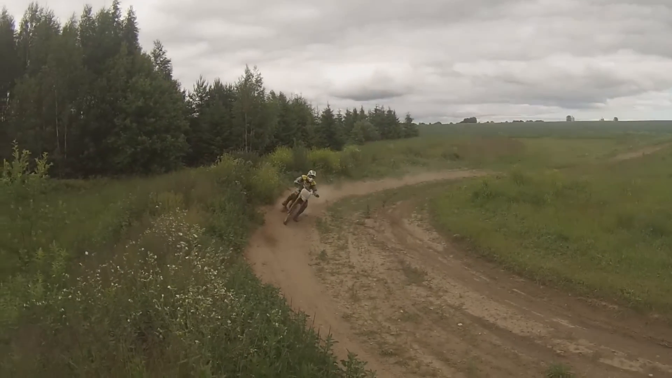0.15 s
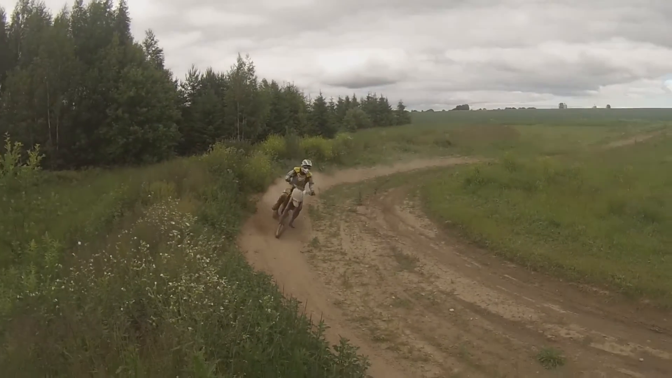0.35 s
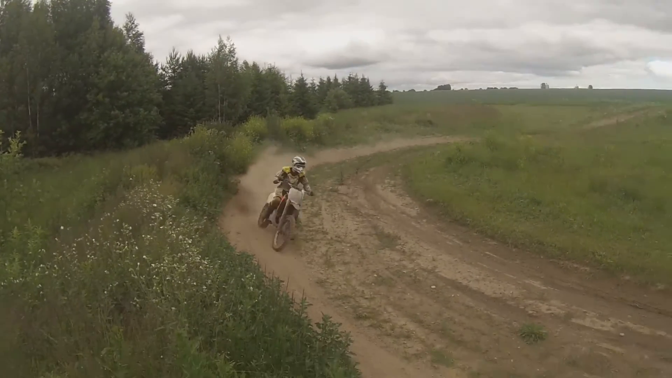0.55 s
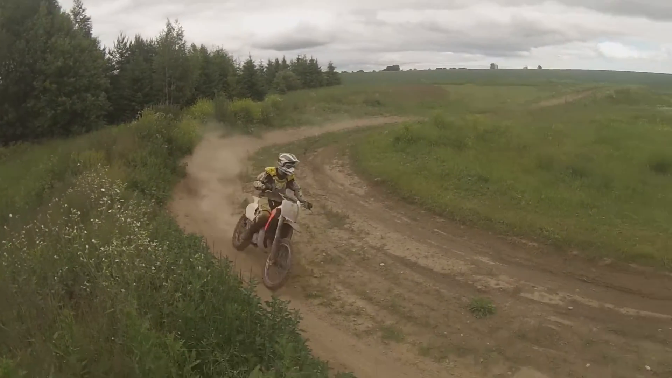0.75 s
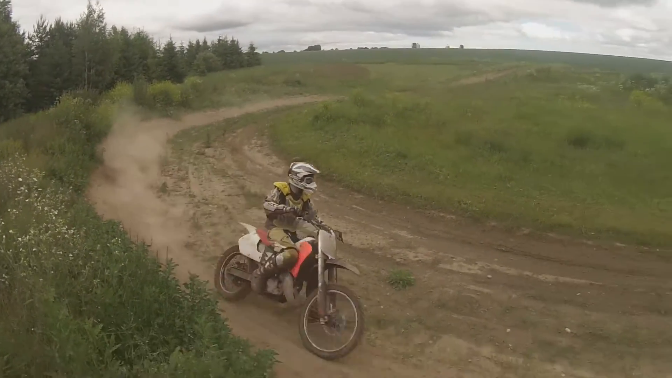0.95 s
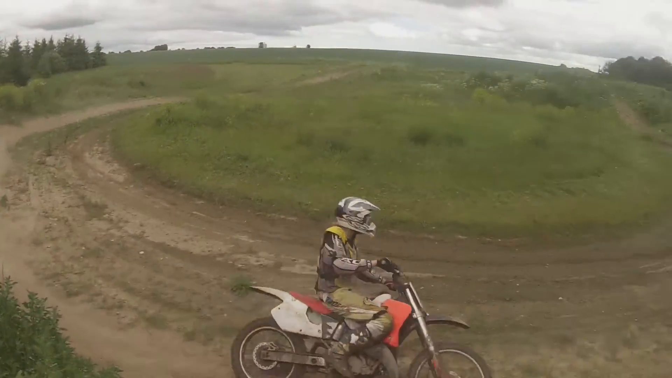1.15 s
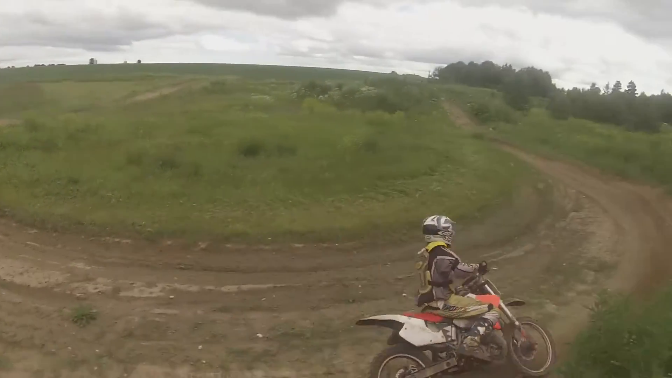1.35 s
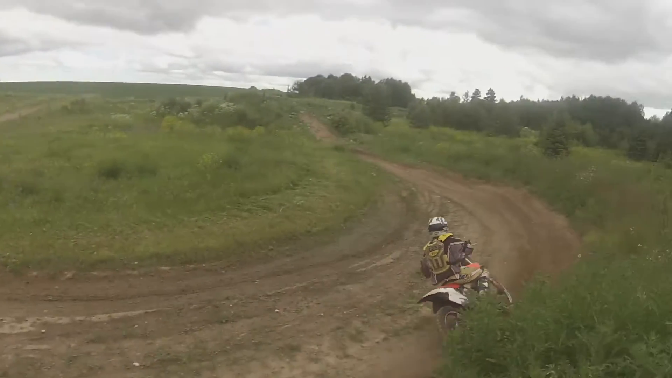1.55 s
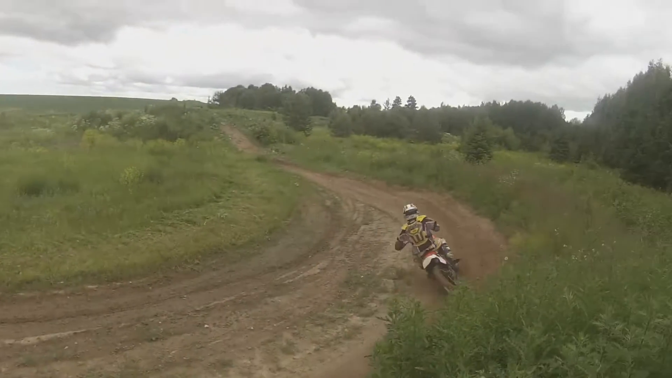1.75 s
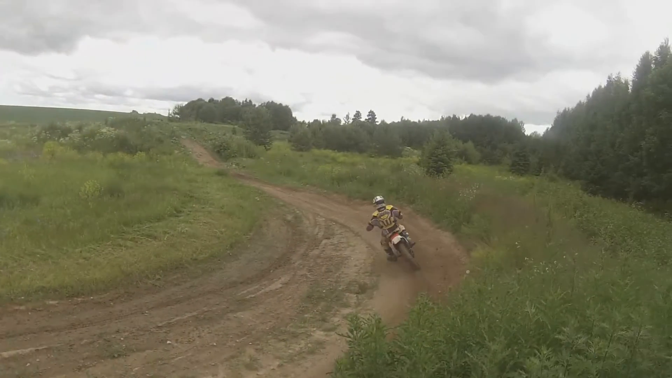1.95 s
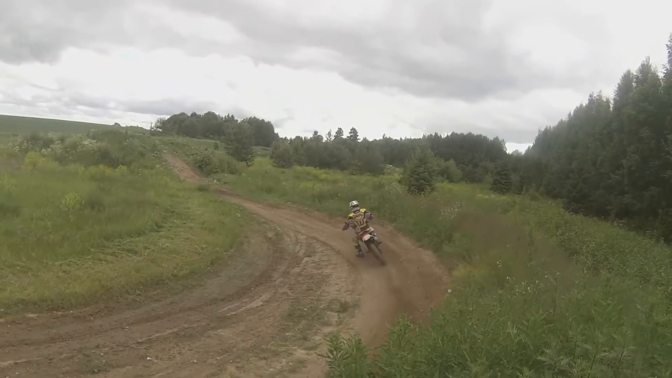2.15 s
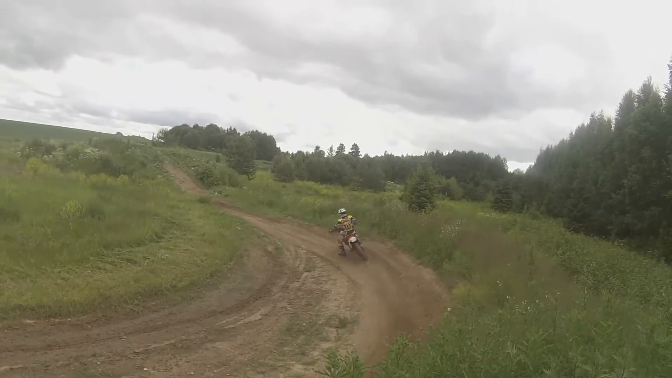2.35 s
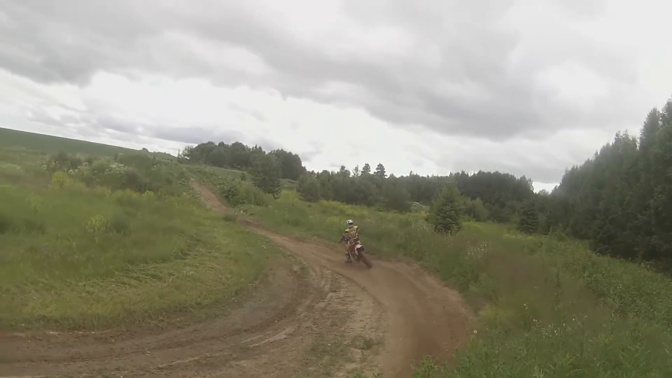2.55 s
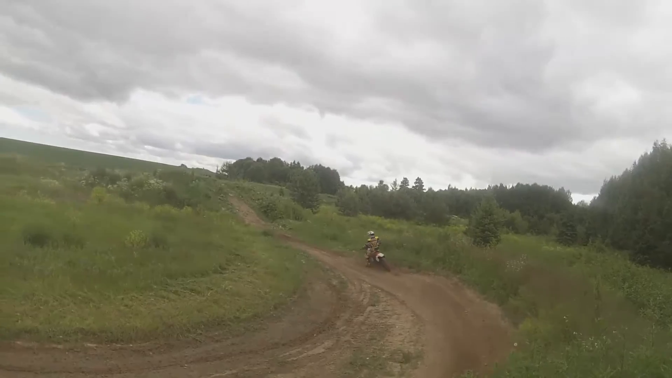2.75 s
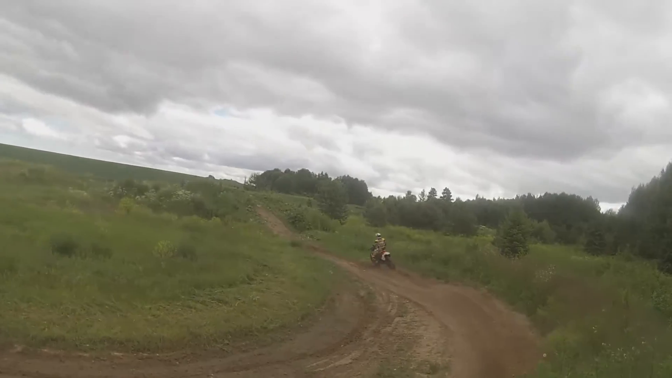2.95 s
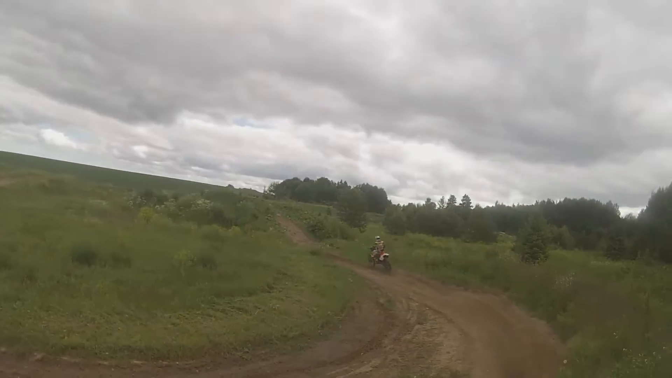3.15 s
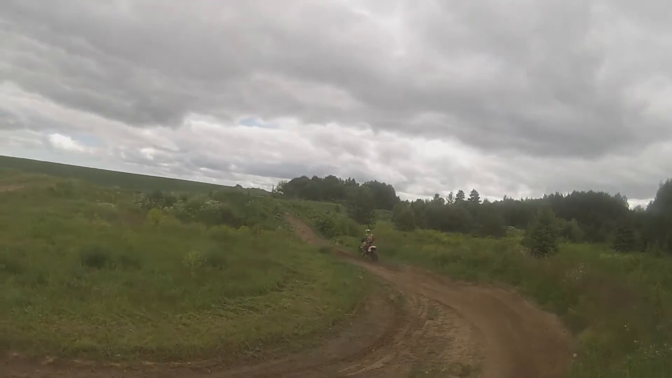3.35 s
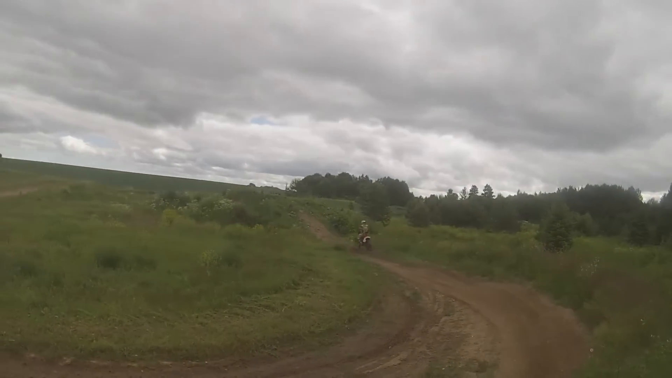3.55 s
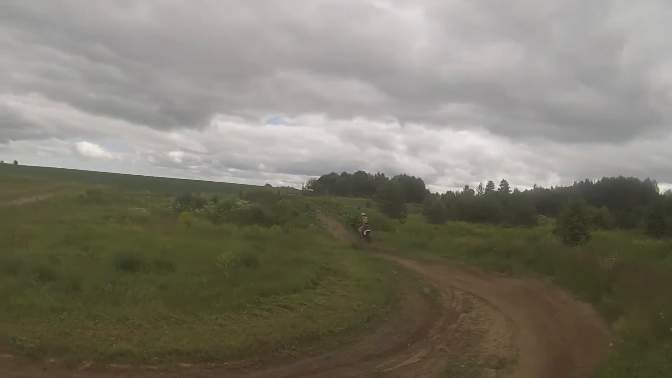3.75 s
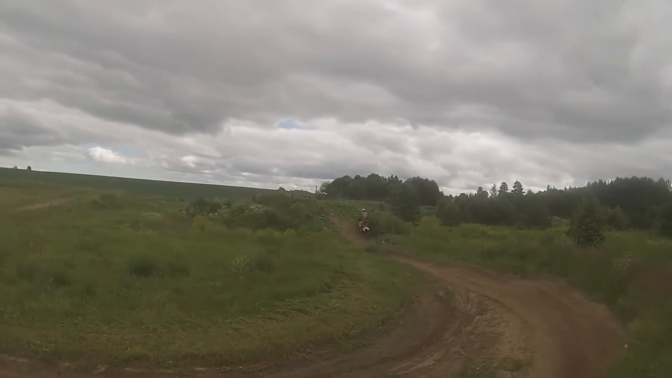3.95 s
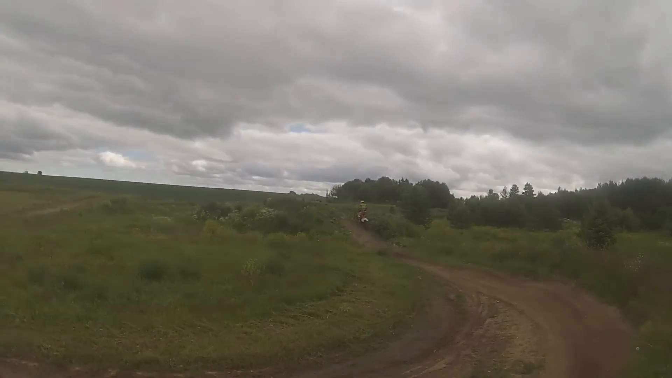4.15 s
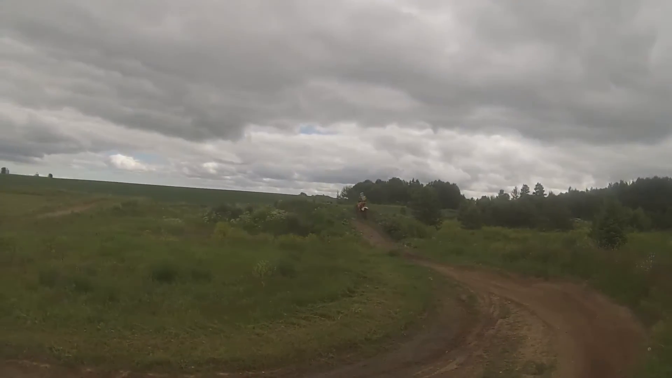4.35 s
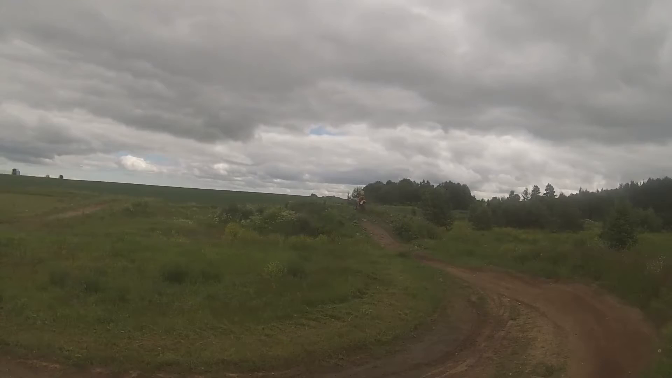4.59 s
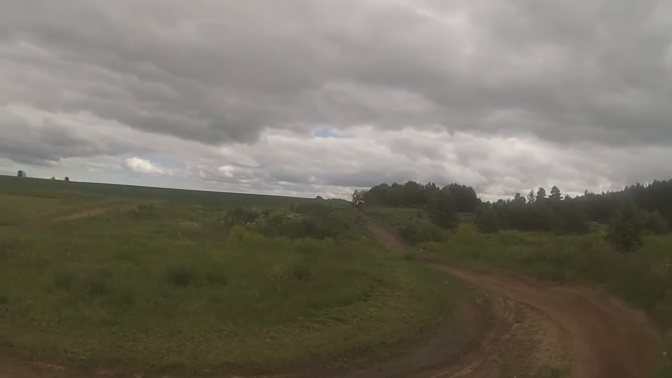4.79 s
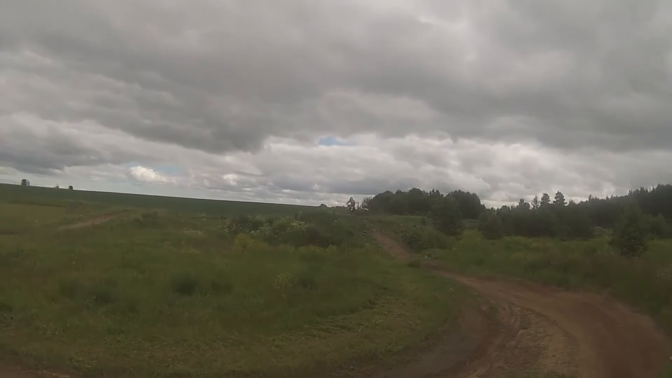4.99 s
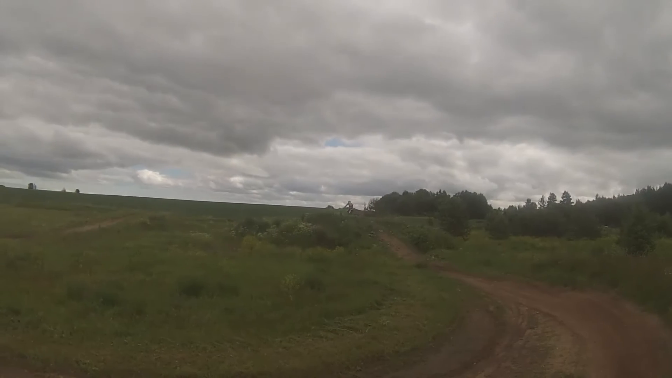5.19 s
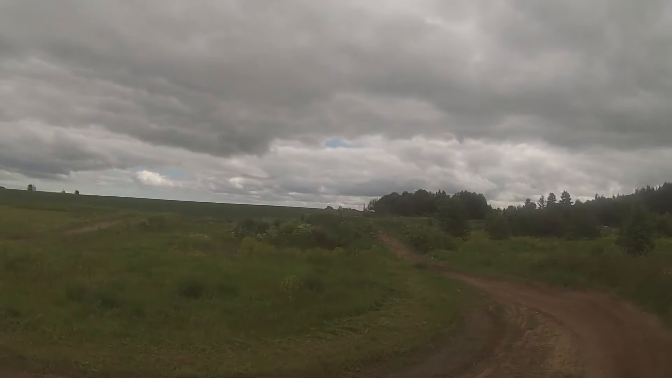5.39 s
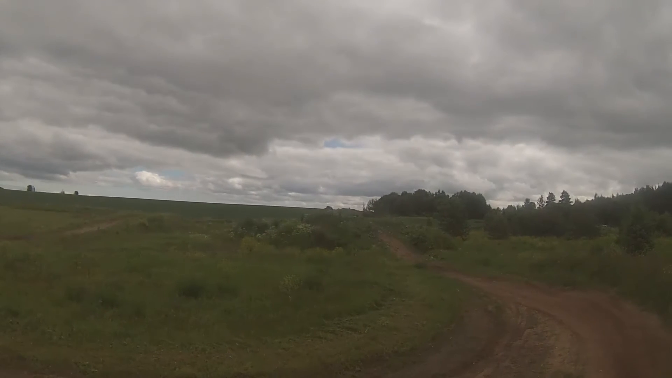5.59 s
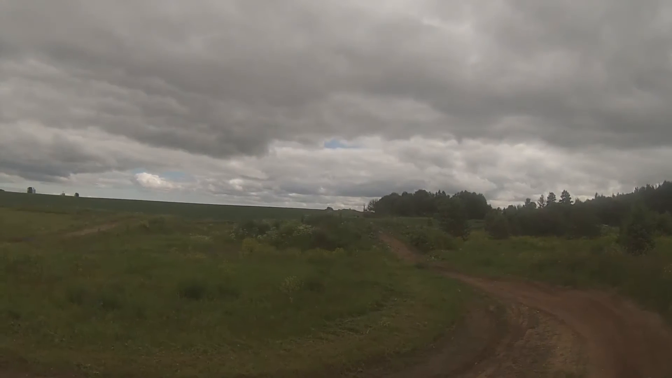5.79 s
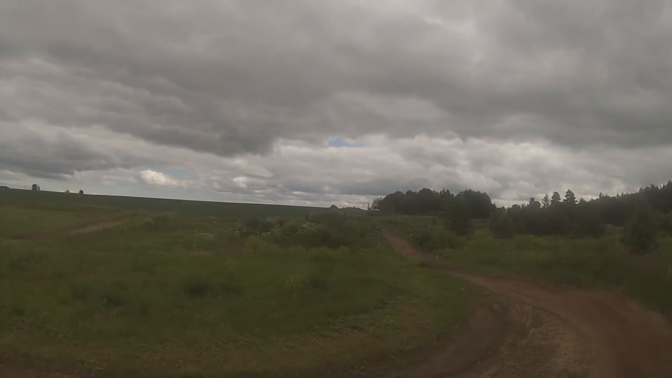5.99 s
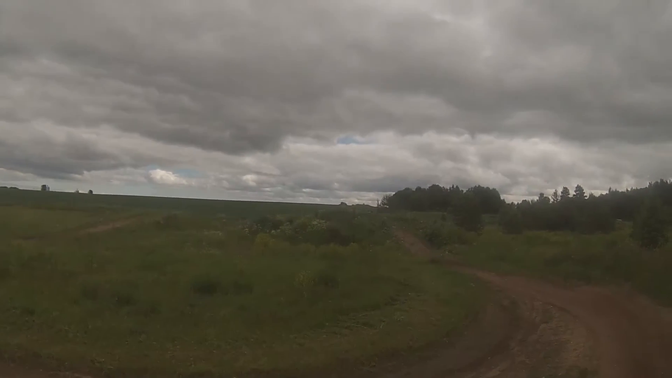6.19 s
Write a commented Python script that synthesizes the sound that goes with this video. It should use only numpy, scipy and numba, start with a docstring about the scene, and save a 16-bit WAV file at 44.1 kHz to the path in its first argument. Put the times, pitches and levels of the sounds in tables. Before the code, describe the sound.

A two-stroke dirt bike buzzes towards a trackside microphone in an open field, growing loud and raspy. The throttle shuts and it coasts close by with engine whine and chain clatter. It opens up again and rides away in uneven bursts, stuttering at light throttle, its exhaust ringing metallically. The engine carries on fainter and duller over soft field air, with a few light wind bumps on the microphone.

```python
"""The buzz of a two-stroke dirt bike, eight metres from the microphone on an open track. It rounds a bend,
coasts past at four metres with engine whining and chain clattering, opens up again and rides off uphill.
Each firing booms in the pipe, barks at the outlet and rings the thin steel chamber; at light throttle
it stutters. It labours on behind the hilltop, over soft field air, and wind nudges the microphone."""
import sys
import numpy as np
from scipy import signal
from scipy.fft import rfft, irfft
from scipy.io import wavfile
from scipy.ndimage import uniform_filter1d
from numba import njit

SR = 44100
rng = np.random.default_rng(int(sys.argv[2]) if len(sys.argv) > 2 else 0)


def dump(signal):
    """Clip the signal to [-1, 1] and save it as 16-bit WAV at the path in sys.argv[1]."""
    limited = np.clip(np.atleast_2d(signal).T, -1, 1)
    pcm = np.round(limited * 32767).astype(np.int16)
    wavfile.write(sys.argv[1], SR, pcm)


N = 274743
T = np.arange(N) / SR

# open air over the field: (frequency [Hz], relative density [dB])
AIR_SPECTRUM = [(12, 4), (20, 10), (47, 5.5), (164, -7), (347, -7.5), (511, -8.5), (1390, -15),
                (1640, -9.5), (2100, -16.5), (2930, -13.5), (3860, -19), (8000, -27), (15000, -33.5)]
# gusts on the microphone: (time [s], decay [s], level [dB])
GUSTS = [(4.936, 0.017, -39), (5.038, 0.022, -43), (5.156, 0.014, -38), (5.231, 0.022, -45),
         (5.287, .015, -44), (5.357, 0.019, -57), (5.462, .02, -45), (5.885, 0.017, -50),
         (5.988, 0.015, -36), (6.035, 0.023, -44.5), (6.09, 0.026, -44.5), (6.132, 0.022, -48),
         (6.17, 0.033, -46)]
# bike to microphone: (time [s], distance [m])
DISTANCE = [(0, 8.1), (.3, 6.55), (.78, 3.47), (1.25, 4), (1.8, 5.87), (2.2, 5.7), (2.5, 9.86), (2.9, 15.2),
            (3.55, 15.4), (4.0, 28.5), (4.8, 31.6), (6.23, 73)]
# engine speed: (time [s], firing rate [Hz])
REVS = [(0, 120), (.08, 123.5), (.29, 105.8), (.36, 113.7), (.43, 123.7), (.55, 127.5), (.6, 114.9),
        (.79, 112.2), (.89, 120.4), (1.03, 103.6), (1.53, 102.6), (1.63, 119.2), (1.69, 111.2),
        (1.81, 115.5), (1.87, 107.9), (1.92, 107.7), (1.964, 103.8), (2.014, 106.3), (2.055, 103.6),
        (2.12, 107.5), (2.3, 108.4), (2.5, 103.5), (2.7, 96.96), (2.785, 120.9), (2.83, 114.3),
        (2.9, 112.3), (2.96, 103.5), (3.05, 107.9), (3.14, 126.3), (3.29, 104.2), (3.37, 115.8),
        (3.52, 111.4), (3.62, 105.4), (3.68, 114.7), (3.85, 91.65), (4.5, 84.44), (4.6, 103.4),
        (4.69, 111.9), (4.79, 106.5), (4.87, 111.1), (4.95, 92.6), (5.03, 96.15), (5.11, 85), (5.19, 101),
        (5.26, 86.97), (5.41, 111.3), (5.55, 136.6), (5.62, 88.1), (5.68, 84.4), (5.8, 95.7), (5.9, 111.3),
        (5.99, 110.2), (6.03, 102.5), (6.06, 102), (6.11, 111.1), (6.23, 107)]
# twists of the throttle: (opens [s], shuts [s], time to fire evenly [s], time to burn clean [s],
# trims for boom [dB], overtones [dB], bark [dB], chamber [dB], rasp [dB], sizzle [dB])
PULLS = [(-.3, .91, 0.041, .1, -1, -1.5, -4.5, -5, -7.5, 6.5),
         (1.515, 2.53, 0.071, 0.26, 3, 2.5, -0.5, -6, -3, 0.5),
         (2.678, 2.91, 0.028, 0.033, 1, -2.5, -4.5, -1.5, -1.5, 3.5),
         (2.83, 3.38, .008, 0.0084, 1, 6, -2, 3, -0.5, 3),
         (3.276, 3.679, 0.0081, 0.0094, -0.5, 6, -7.5, 0.5, -2.5, 0),
         (4.142, 4.563, 1.065, 0.92, -13.5, -3.5, .5, 0.5, -4, -1),
         (4.499, 5.38, .07, 0.26, -6.5, 1, 7.5, 4.5, -0.5, 3.5),
         (5.267, 5.565, 0.018, 0.015, 5, 1, 2.5, 2.5, -0.5, 7),
         (5.64, 6.501, 0.031, 0.17, 3, 0, -0.5, -10, -23, -25)]
# the engine catches between misfires: (time [s], length [s], level over the misfires [dB])
CATCHES = [(1.511, .018, 10), (1.541, .017, 5.5), (1.577, .038, 4.5), (1.621, .026, 5.5),
           (2.580, .012, 3.5), (2.677, .007, 6), (2.698, .03, 7), (4.148, .016, 3), (4.172, .022, 6),
           (4.239, .022, 6.5), (4.281, .021, 6.5), (4.323, .021, 8.5), (4.358, .018, 5.5),
           (4.390, .022, 6.5), (4.435, .018, 13), (4.482, .02, 16), (4.518, .012, 11), (4.535, .05, 5)]
# the tuned pipe's pressure wave and its weaker harmonics: (multiple of firing rate, relative level [dB])
BOOM_ORDERS = [(2, 0)]
OVERTONE_ORDERS = [(1, 3.5), (3, 8), (4, 6), (5, -4.5), (6, -10.5)]
# echoes from the pipe's cones and baffles: (delay [s], gain)
CONE_ECHOES = [(.0007, -.52), (.0013, .48), (.0021, .4), (.0033, -.35), (.0045, .42)]
# the bark at the outlet: (time [s], pitch [Hz], trim [dB])
BARK_CURVE = [(0, 890, -4), (.3, 890, -0.5), (.85, 946.4, -1), (.95, 1097, 1), (1.5, 1240, 5.5),
              (1.635, 1280, 8), (1.67, 902, 2), (1.8, 987, 3), (1.87, 1010, 2.5), (1.96, 1096, 5.5),
              (2.06, 919, 3.5), (2.15, 976, 6.5), (2.32, 940, 1.5), (2.44, 1086, 2.5), (2.79, 1057, 3.5),
              (2.87, 1012, -2.5), (3.2, 997.3, 0), (4.2, 1030, -0.5), (4.65, 980, -4), (4.9, 1114, -10),
              (5.45, 1094, 0.5), (5.7, 911, -3), (5.95, 778, 1.5), (6.23, 766.4, 4.5)]
# outlet resonances, which carry further over the grass than the bark: (frequency [Hz], width [Hz])
OUTLET_MODES = [(795, 162), (1130, 108)]
# their strength against the bark: (time [s], lower mode [dB], upper mode [dB])
OUTLET_MODE_LEVELS = [(.85, -5, 5), (1.6, -5.5, -5), (1.75, -11, -24), (2.3, 4, 5.5), (2.5, -1, 6),
                      (2.9, -11.5, -2.5), (4.75, 18, 14), (5.05, 14, 19), (5.88, 18, 11)]
# resonances of the chain and engine, then of the steel chamber and silencer from low to high:
# (base frequency [Hz], base width [Hz], level from ahead [dB], level from behind [dB])
CLATTER_MODES = [(1555, 620, 3, 14), (3180, 485, 9, 9.5), (4605, 1300, -5, -16)]
CHAMBER_MODES = [(1692, 54, 14, 14.5), (1798, 82, 7.5, 6.5), (1990, 60, -21, -8.5)]
RASP_MODES = [(2316, 110, -1, -11), (2776, 103, 11.5, 7), (2948, 175, 4.5, 3), (3383, 67, -6, -1.5),
              (3366, 50, 7, -9), (4272, 292, -1, -7.5), (4316, 360, -5.5, -10)]
SIZZLE_MODES = [(5220, 500, 5, 1.5), (5615, 103, 12.5, 6), (5970, 96, 9.5, -21), (6440, 530, 4, -3),
                (8190, 360, -10, -15), (8560, 590, -1, -6.5), (11600, 2400, -11, -14)]
# the chamber's main ring: (time [s], pitch [Hz])
CHAMBER_PITCH = [(0, 1664), (1.7, 1616), (2.1, 1764), (2.35, 1782), (2.85, 1698), (3.2, 1635), (4.5, 1665)]
# the chamber howls for a few firings: (time [s], spread [s], boost [dB])
HOWLS = [(.795, 0.021, 9), (2.795, 0.016, 3.5), (3.21, 0.047, 5), (5.02, 0.042, 1)]
# how each part of the exhaust answers the engine: (base level at 1 m pulling [dB], coasting [dB],
# change for poor burning [dB], for a full flare of revs [dB], alongside [dB], behind the crest [dB])
BOOM_LEVELS = (-18, -45, -16.5, -2, 0, -10.5)
OVERTONE_LEVELS = (-29, -52.5, -6, 3, 5.5, 2.5)
BARK_LEVELS = (-19, -43, -9.5, 5.5, 0.5, -9.5)
CHAMBER_LEVELS = (-21.5, -32.5, -0.5, 13, 4.5, -0.5)
RASP_LEVELS = (-19, -35, 0.5, 11.5, 3.5, -2.5)
SIZZLE_LEVELS = (-35.5, -48, -1.5, 8, 10, -7)

PASS_S, CREST_S = 1.375, 4.94  # the bike passes the microphone; it drops behind the hilltop


def undb(db):
    """Decibels to gain."""
    return 10 ** (np.asarray(db) / 20)


def curves(rows):
    """Each column of a table, joined by straight lines in time."""
    times, *columns = np.transpose(rows)
    return [np.interp(T, times, column) for column in columns]


def unit(x):
    """Scale to rms 1."""
    return x / np.sqrt(np.mean(x ** 2))


def unit_now(x, span_s=.13):
    """Scale to rms 1 from moment to moment."""
    return x / np.sqrt(uniform_filter1d(x ** 2, int(span_s * SR)) + 1e-12)


def noise():
    """White noise."""
    return rng.standard_normal(N)


def walk(rate):
    """Random drift, spread near 1, with `rate` new values a second."""
    return 1.2 * np.interp(T * rate, np.arange(4096), rng.standard_normal(4096))


def ramp(start, length):
    """Rises from 0 at start to 1 over length seconds."""
    return np.clip((T - start) / max(length, 1e-3), 0, 1)


def window(start, length, edge):
    """A gate of length seconds, with slopes centred on its ends."""
    return np.clip(np.minimum(T - start, start + length - T) / edge + .5, 0, 1)


def bell(centre, span):
    """A smooth swell to 1 at centre, span seconds to either side."""
    return np.exp(-((T - centre) / span) ** 2)


@njit
def svf(x, hz, width):
    """State-variable band-pass with a moving centre, gain 1 there."""
    y, mid, low = np.empty(len(x)), 0., 0.
    for i in range(len(x)):
        g, damping = np.tan(np.pi * hz[i] / SR), width / hz[i]
        v = (mid + g * (x[i] + 1e-18 - low)) / (1 + g * (g + damping))
        mid, low, y[i] = 2 * v - mid, low + 2 * g * v, damping * v
    return y


def band(x, hz, *widths):
    """A resonance at hz: one band-pass for each width [Hz], in series."""
    for width in widths:
        x = svf(x, np.minimum(hz * np.ones(N), SR * .45), float(width))
    return x


def field_air():
    """Soft air in grass and trees all round the microphone, gently swelling."""
    hz, db = np.transpose(AIR_SPECTRUM)
    bins = np.maximum(np.fft.rfftfreq(N, 1 / SR), 1)
    slope = undb(np.interp(np.log(bins), np.log(hz), db))
    air = irfft(rfft(noise()) * slope, N)
    return unit(air) * undb(-54 + .8 * walk(4))


def wind(attack_s=.004):
    """Wind right on the microphone: a low restless rumble with short buffets."""
    rumble = unit(band(noise(), 42, 80, 140)) * undb(-67.5 + 3 * walk(7))
    gusts = sum(undb(db) * ramp(s, attack_s) * np.exp(-np.maximum(T - s, 0) / decay)
                for s, decay, db in GUSTS)
    buffeting = band(band(noise(), 67, 85), 61, 112.1)
    return rumble + gusts * unit_now(buffeting, span_s=.026)


def ring(x, modes, shift, low_hz):
    """A passing body's resonances, wandering as it leans and shakes, cut below low_hz; rms 1."""
    behind = .5 + .5 * np.tanh((T - PASS_S) / .19)
    body = 0
    for hz, width, ahead_db, behind_db in modes:
        centre = hz * shift * (1 + .012 * walk(7))
        mode = band(x, centre, 1.15 * width, 4 * width) * undb(1.1 * walk(13))
        body += undb(ahead_db + (behind_db - ahead_db) * behind) * mode
    return unit_now(signal.sosfilt(signal.butter(4, low_hz, "high", fs=SR, output="sos"), body))


def chain():
    """Dense clatter of chain and engine, heard only close alongside."""
    ticks = noise() * undb(.2 * walk(400))
    clatter = ring(ticks, CLATTER_MODES, shift=.94, low_hz=900)
    thrash_db = 3 * bell(1.193, .058)  # the slack chain thrashes for a moment
    return clatter * undb(-37.5 + thrash_db) * bell(PASS_S, .89)


RATE_HZ, = curves(REVS)
METRES, = curves(DISTANCE)


def coasting_whine(harmonic=5):
    """Coasting past, the engine whines: a wavering fifth harmonic of the firing rate, a weaker fourth."""
    phase = 2 * np.pi * np.cumsum(harmonic * RATE_HZ * (1 + .0034 * walk(57.9))) / SR
    tones = np.sin(phase) + undb(-3) * np.sin(.8 * phase)
    return tones * undb(-30 + 2.3 * walk(38.9)) * window(1.27, .52, edge=.49) / METRES


def rider(open_s=.014, shut_s=.05, ease_s=.071):
    """The throttle hand: whether the engine pulls, how evenly, how cleanly (0-1), and six trims [dB]."""
    pulling, even, clean = np.zeros((3, N))
    trims = np.zeros((6, N))
    for opens, shuts, settles, clears, *trim_db in PULLS:
        on = ramp(opens - open_s / 2, open_s) * (1 - ramp(shuts - shut_s / 2, shut_s))
        pulling += on * (1 - pulling)
        held = on * (1 - ramp(shuts - ease_s, ease_s))  # the hand eases off before shutting
        even = np.maximum(even, held * ramp(opens, settles) ** 2)
        clean = np.maximum(clean, held * ramp(opens, clears))
        trims += on * (np.array(trim_db)[:, None] - trims)
    return pulling, even, clean, trims


PULLING, EVEN, CLEAN, TRIMS = rider()
BOOM_TRIM, OVERTONE_TRIM, BARK_TRIM, CHAMBER_TRIM, RASP_TRIM, SIZZLE_TRIM = TRIMS
THROTTLE = .14 + .63 * EVEN


def at_microphone(levels, trim_db, cruise_hz=110.2, full_flare_hz=20.6):
    """Gain of one exhaust part, set by throttle, revs, distance and the hilltop."""
    pull_db, coast_db, poor_db, flare_db, side_db, crest_db = levels
    hidden = ramp(CREST_S, .13)
    # a flare: the wheel slips and the revs jump over their running mean, or cruising speed if higher
    steady_hz = np.maximum(uniform_filter1d(RATE_HZ, int(.48 * SR)), cruise_hz)
    flare = PULLING * (1 - hidden) * np.clip((RATE_HZ - steady_hz) / full_flare_hz, 0, 1) ** 1.31
    engine_db = coast_db + (pull_db - coast_db) * PULLING + poor_db * (PULLING - CLEAN)
    place_db = side_db * bell(PASS_S, .45) + crest_db * hidden
    return undb(engine_db + flare_db * flare + place_db + trim_db) / METRES


def firings(turns):
    """One sharp pulse a turn; a closed throttle makes size and timing uneven."""
    at = np.interp(np.arange(1, int(turns[-1])), turns, np.arange(N))
    idle = (1 - THROTTLE[at.astype(int)]) ** 3
    jitter, strength = rng.standard_normal((len(at), 2)).T
    at += SR * (8e-6 + 2.5e-4 * idle) * jitter
    size = undb((1.1 + 2.5 * idle) * np.tanh(strength))
    for s, _, _ in CATCHES:  # each catch opens with a bang
        at[np.argmin(abs(at - s * SR))] = (s + .002) * SR
    taps = at.astype(int)[:, None] + np.arange(-7, 9)
    pulses = np.zeros(N)
    np.add.at(pulses, np.clip(taps, 0, N - 1), size[:, None] * np.sinc(taps - at[:, None]))
    return unit(pulses)


def stutter(span_s=.09):
    """Misfires save up fuel, which burns in fewer, harder bangs."""
    gain = undb(sum(db * window(s, length, .003) for s, length, db in CATCHES))
    return gain / np.sqrt(uniform_filter1d(gain ** 2, int(span_s * SR)))


def blast(turns, pulses, gas_open, gas_shut):
    """Firing pulses with puffs of turbulent gas, whose share of the power follows the throttle."""
    gas = gas_shut + (gas_open - gas_shut) * THROTTLE
    decay = .33 - .1 * ramp(4.7, 1)  # crisper as the silencer turns towards the microphone
    puff = (np.exp(-(turns % 1) / decay) + decay) * undb(1.2 * walk(110))
    return np.sqrt(1 - gas) * pulses + np.sqrt(gas) * unit(puff * noise())


def cones(x):
    """Echoes inside the pipe; their delays drift with gas heat, so the metallic colour keeps shifting."""
    return x + sum(gain * np.interp(T - delay * (1 + .035 * walk(4)), T, x)
                   for delay, gain in CONE_ECHOES)


def rattle(per_s=600):
    """Small ticks of loose metal."""
    return unit((rng.random(N) < per_s / SR) * np.tanh(noise())) * undb(-8)


def airbox(push, hz=1292):
    """The intake honks under open throttle while the bike points at the microphone."""
    honk = unit_now(band(push, hz, 110, 110))
    return honk * undb(-19.5) * CLEAN * bell(.84, .58) / METRES


def steel(turns, pulses):
    """Chamber and silencer ring; the higher the steel rings, the more of it is driven by gas."""
    low_drive = blast(turns, pulses, gas_open=.12, gas_shut=.6)
    mid_drive = blast(turns, pulses, gas_open=.3, gas_shut=.75) + rattle()
    high_drive = blast(turns, pulses, gas_open=.55, gas_shut=.95)
    howl_db = sum(db * bell(s, spread) for s, spread, db in HOWLS) + 1.5 * walk(22)
    chamber_hz, = curves(CHAMBER_PITCH)
    receding_m_s = .69 * np.tanh((T - PASS_S) / .12)
    doppler = 1 / (1 + receding_m_s / 343)
    chamber = ring(cones(low_drive), CHAMBER_MODES, chamber_hz / CHAMBER_MODES[0][0], low_hz=1450)
    rasp = ring(cones(mid_drive), RASP_MODES, doppler, low_hz=2010)
    sizzle = ring(cones(high_drive), SIZZLE_MODES, doppler, low_hz=5000)
    # air and grass soak up the very top with distance
    dull = signal.sosfiltfilt(signal.butter(3, 9000, fs=SR, output="sos"), sizzle)
    sizzle = dull + (sizzle - dull) * np.exp(-METRES / 22)
    return (at_microphone(CHAMBER_LEVELS, CHAMBER_TRIM + howl_db) * chamber
            + at_microphone(RASP_LEVELS, RASP_TRIM) * rasp
            + at_microphone(SIZZLE_LEVELS, SIZZLE_TRIM) * sizzle)


def bark(age_s, hz, swings=4.3, climb=.13):
    """A short packet of swings after each firing, climbing in pitch; silent until the next."""
    progress = np.clip(age_s * hz * (1 + .025 * walk(110)) / swings, 0, 1)
    cycles = swings * (progress - climb * progress * (1 - progress))
    packet = np.sin(np.pi * progress) * np.sin(2 * np.pi * cycles)
    return unit_now(packet) * undb(1.1 * walk(100) + .6 * walk(14))


def outlet(turns, pulses, push):
    """The outlet barks and rings after each pulse, turning breathy when the firing is uneven."""
    hz, bark_db = curves(BARK_CURVE)
    gas = blast(turns, pulses, gas_open=1, gas_shut=.6)
    breath = unit_now(band(gas, hz, 600, 700))
    voice = np.sqrt(EVEN) * bark(turns % 1 / RATE_HZ, hz) + np.sqrt(1 - .97 * EVEN) * breath
    tail = sum(undb(db) * unit_now(band(push, mode_hz, width, 2 * width))
               for (mode_hz, width), db in zip(OUTLET_MODES, curves(OUTLET_MODE_LEVELS)))
    # poor burns add a hollow chuff
    chuff = unit(band(band(push, 350, 210), 627, 250)) * (1 - THROTTLE) ** 2 * undb(1)
    return at_microphone(BARK_LEVELS, BARK_TRIM + bark_db) * (unit_now(voice + tail) + chuff)


def pipe(turns, orders, lead):
    """Low harmonics of the tuned pipe, `lead` turns ahead of the pulse; ragged on a shut throttle."""
    phase = 2 * np.pi * (turns + lead)
    wave = sum(undb(db + 1.4 * walk(5)) * np.cos(k * phase + .8 * (k - 2) ** 2) for k, db in orders)
    return unit_now(wave) * undb((.5 + 8.6 * (1 - THROTTLE) ** 2) * walk(90))


def bike():
    """The two-stroke fires once a turn, driving the pipe, outlet, airbox and steel."""
    turns = np.cumsum(RATE_HZ * (1 + .002 * walk(40))) / SR
    pulses = firings(turns)
    boom = at_microphone(BOOM_LEVELS, BOOM_TRIM) * pipe(turns, BOOM_ORDERS, lead=-.17)
    overtones = at_microphone(OVERTONE_LEVELS, OVERTONE_TRIM) * pipe(turns, OVERTONE_ORDERS, lead=.273)
    push = blast(turns, pulses, gas_open=.02, gas_shut=.8 * (1 - THROTTLE) + .1)
    push += .3 * cones(push)
    bangs = outlet(turns, pulses, push) + airbox(push) + steel(turns, pulses)
    return boom + overtones + bangs * stutter()


def scene():
    """Everything at one trackside microphone."""
    return (bike() + coasting_whine() + chain() + field_air() + wind())[None]


def record(dry, top_hz=15200):
    """The recorder cuts the top."""
    return signal.sosfilt(signal.ellip(10, .2, 80, top_hz, fs=SR, output="sos"), dry)


dry = scene()
out = record(dry)
dump(out)
```